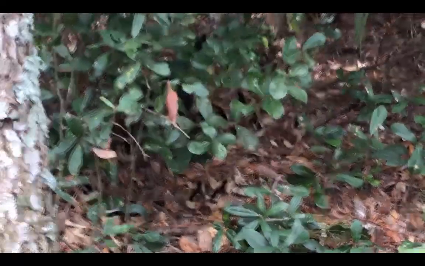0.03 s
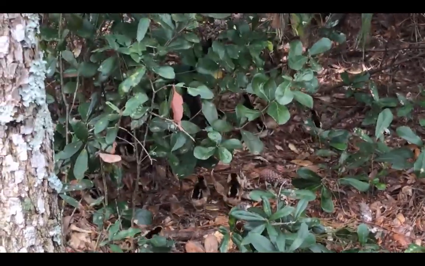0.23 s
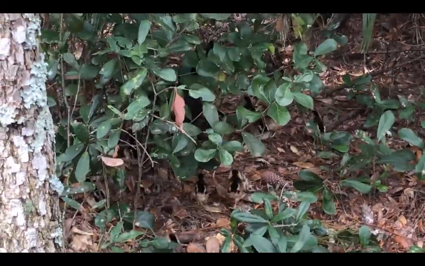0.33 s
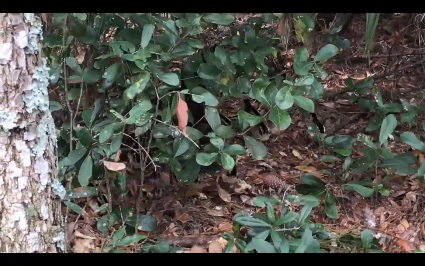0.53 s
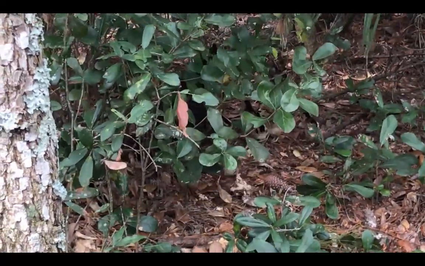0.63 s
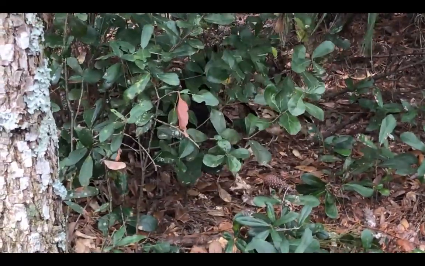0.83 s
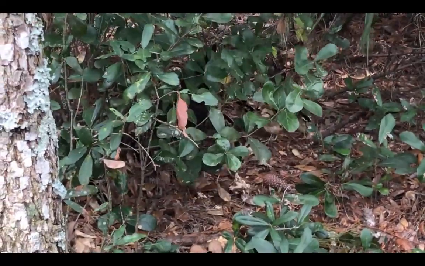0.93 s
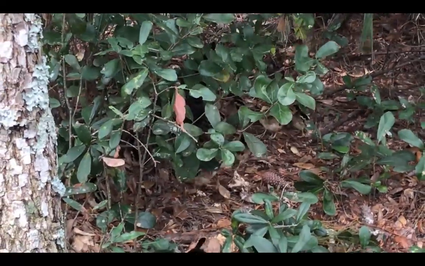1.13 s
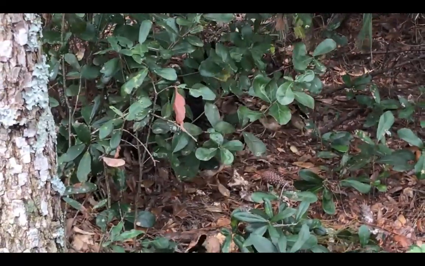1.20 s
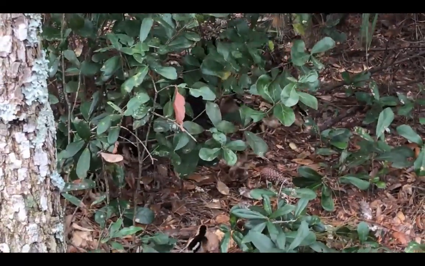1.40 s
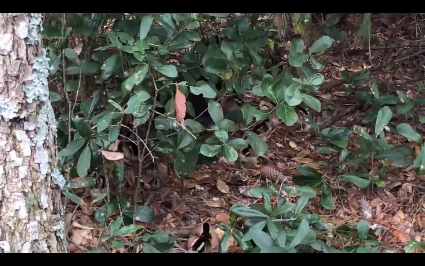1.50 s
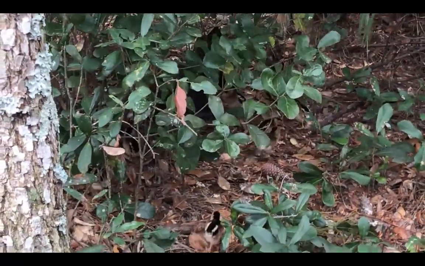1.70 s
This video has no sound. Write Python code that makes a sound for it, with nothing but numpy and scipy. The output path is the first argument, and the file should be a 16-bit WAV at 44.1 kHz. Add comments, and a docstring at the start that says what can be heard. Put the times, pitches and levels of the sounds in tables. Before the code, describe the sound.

Dry leaf litter crackles and ticks in small bursts as birds scratch through it nearby. Quiet, high peeps and short clucks come in between, over a steady woodland hush and soft, low puffs of wind on the microphone.

```python
"""At the edge of a wood, chicks scratch in dry leaves a few metres from a microphone.
Their feet make bursts of tiny crackles, and now and then a leaf or twig snaps.
They peep in thin whistles, and a few short low clucks, two louder than the rest, ring in a throat.
Puffs of light wind thump on the microphone over the steady hush of air in the trees."""
import sys
import numpy as np
from scipy import signal
from scipy.fft import rfft, irfft, next_fast_len
from scipy.io import wavfile
from scipy.ndimage import map_coordinates

SR = 44100
rng = np.random.default_rng(int(sys.argv[2]) if len(sys.argv) > 2 else 0)


def generate_wav(sig):
    """Save sig (samples, or channels by samples) to the path in sys.argv[1] as 16-bit PCM at SR."""
    pcm = np.round(np.clip(np.atleast_2d(sig).T, -1, 1) * 32767).astype(np.int16)
    wavfile.write(sys.argv[1], SR, pcm)


N = 77175
T = np.arange(N) / SR  # the time of each sample in seconds

# The tone of air in the trees. Each row: frequency in Hz, relative strength in dB.
HUSH_TONE = [(200, -1), (320, 4.5), (470, -2), (650, 2.5), (1150, 3.5), (1600, -1.5), (2100, -7),
             (3000, -9.5), (4000, -9), (4900, -14.5), (6700, -12.5), (7700, -20), (9500, -18.5),
             (10400, -37), (12000, -21), (15500, -53)]
# How loud that hush is. Each row: time in seconds, level in dB.
HUSH_LOUDNESS = [(0, -54.5), (.45, -53), (.9, -52), (1.75, -51.5)]
# The tone of air moving past the microphone. Each row: frequency in Hz, relative strength in dB.
RUMBLE_TONE = [(20, -14), (40, -5), (65, 11), (95, -4.5), (140, -2.5), (220, -13.5), (400, -33.5)]
# How loud that rumble is. Each row: time in seconds, level in dB.
RUMBLE_LOUDNESS = [(0, -50.5), (.05, -53), (.25, -49.5), (.47, -51.5), (.6, -52.5), (.88, -50.5),
                   (1.0, -49), (1.14, -54), (1.21, -53), (1.4, -50.5), (1.61, -56), (1.67, -48),
                   (1.75, -54.5)]
# Swirls of wind. Each row: time in seconds, peak level in dB, band centre in Hz, band narrowness.
WIND_PUFFS = [(.224, -29.5, 41.6, 1.65), (0.242, -33, 40, 4.8), (0.263, -32, 60, 1.6),
              (0.286, -28, 62, 1.3), (0.298, -26.5, 90, 1.2), (0.321, -22, 77, 1.25), (.341, -20, 37, 1.44),
              (0.351, -25.5, 82, 1.4), (0.362, -26, 38, 1.8), (0.397, -30, 62, 1.15), (0.419, -38, 50, 2.7),
              (0.517, -31, 82.4, 2.4), (0.536, -26.5, 43.4, 1.37), (0.68, -46.5, 110, 3.8),
              (0.908, -26.5, 61, 1.86), (0.933, -32.5, 40.4, 1.4), (0.966, -38, 44.7, 3.5),
              (1.017, -39.5, 55, 1.8), (1.058, -30, 41, 1.7), (1.074, -33, 56.5, 1.83),
              (1.306, -34, 70, 2.5), (1.373, -40.5, 80, 2.5), (1.456, -20.5, 83.7, 3.36),
              (1.472, -35.5, 40, 1.8), (1.679, -46, 50, 2.4)]
# The tone of stirring leaves. Each row: frequency in Hz, relative strength in dB.
LEAF_TONE = [(1200, -25), (2300, 9.5), (4000, 1), (7000, -13), (15000, -12)]
# How busily the birds stir the leaves. Each row: time in seconds, level in dB.
LEAF_LOUDNESS = [(0, -57.5), (.1, -63.5), (.27, -58.5), (.375, -65), (.43, -56.5), (.53, -62), (.6, -80),
                 (.66, -62), (.76, -61.5), (.9, -67.5), (1.05, -62.5), (1.2, -68), (1.28, -60), (1.42, -63),
                 (1.48, -69), (1.66, -57), (1.75, -76)]
# Leaves or twigs breaking, and first a low knock on a twig. Each row: start in seconds, level in dB, centre in
# Hz, width in octaves.
TWIG_SNAPS = [(0.064, -41, 417, 0.41), (0.283, -53, 3300, .5), (0.397, -43.5, 1970, 0.8),
              (0.488, -49.5, 2760, 0.39), (.641, -46, 2700, .6), (0.819, -44.5, 3300, 0.62),
              (0.868, -49, 2300, 0.23), (.957, -53, 3270, 0.51), (1.236, -46.5, 2220, 0.4),
              (1.354, -44.5, 2530, 0.33), (1.517, -50, 2450, 0.25)]
# Strokes of a foot. Each row: start and fade time in seconds, level in dB, centre in Hz,
# width in octaves.
FOOT_SCRATCHES = [(0.015, 0.054, -52.5, 2220, 0.57), (0.137, 0.039, -57, 5630, 0.39),
                  (0.401, .018, -50.5, 2010, 0.48), (.64, 0.057, -55, 3320, 0.8),
                  (.73, 0.031, -61, 7400, 0.68), (.755, 0.016, -50, 2600, .6),
                  (0.818, 0.026, -51, 3900, 0.48), (.893, 0.011, -44.5, 1850, 0.33),
                  (.918, .012, -49.5, 1950, 0.11), (0.953, 0.026, -49, 3120, 0.4),
                  (1.042, .03, -57, 2740, 0.21), (1.16, 0.019, -58.5, 6500, 0.83),
                  (1.235, 0.026, -47, 2200, 0.53), (1.254, 0.015, -53.5, 3900, 0.85),
                  (1.355, 0.095, -57, 4380, 1.1), (1.515, 0.027, -53.5, 5000, 0.9),
                  (1.623, 0.035, -55, 4500, 2.2), (1.742, .012, -51, 2700, 0.46)]
# Low clucks. Each row: start and length in seconds, pitch in Hz, level in dB.
CLUCK_CALLS = [(0.127, 0.021, 420, -53), (0.517, 0.017, 426, -53.5), (0.932, 0.024, 570, -44),
               (1.614, 0.033, 303, -45.5), (1.668, 0.015, 512, -53)]
# Where a bird's throat rings. Each row: centre and width in Hz, relative strength in dB.
THROAT_RINGS = [(585, 94, -8.5), (868, 410, -5.5), (1285, 205, -6.5), (1580, 67, -6.5), (2730, 100, -15)]
# Peeps. Each row: start and length in seconds, first, middle and last pitch in Hz, level in dB.
PEEP_CALLS = [(0.341, 0.015, 4100, 4150, 4220, -61), (0.415, 0.02, 3450, 3550, 3300, -62),
              (0.443, 0.022, 4300, 4500, 4530, -66), (.531, .026, 3850, 3880, 3850, -60),
              (.574, .052, 3600, 3640, 3150, -57), (.84, .05, 4000, 3810, 3480, -55),
              (1.083, 0.06, 4000, 3930, 3330, -63), (1.358, 0.034, 4250, 4150, 4100, -60.5),
              (1.393, .024, 4100, 4300, 4750, -64), (1.6, 0.012, 3650, 3720, 3600, -70)]


def amp(db):
    """Turn decibels into a number to multiply a sound by."""
    return 10 ** (np.asarray(db) / 20)


def unit(x):
    """Scale a sound so that its average strength (rms) is 1."""
    return x / np.sqrt(np.mean(x ** 2) + 1e-20)


def at_level(x, length, db):
    """Scale a short sound to an average level of db over its length in seconds."""
    return amp(db) * x * np.sqrt(length * SR / (np.sum(x ** 2) + 1e-20))


def filtered(x, response):
    """Multiply each frequency in a sound by response(hz)."""
    size = next_fast_len(N + SR // 2)
    hz = np.fft.rfftfreq(size, 1 / SR) + 1e-3
    return irfft(rfft(x, size) * response(hz), size)[:N]


def coloured(x, tone):
    """Shape a sound with a tone table, at strength 1."""
    points_hz, db = np.transpose(tone)
    return unit(filtered(x, lambda hz: amp(np.interp(np.log(hz), np.log(points_hz), db))))


def loudness(table):
    """A volume curve that slides between the rows of a loudness table."""
    return amp(np.interp(T, *np.transpose(table)))


def noise():
    """An even hiss (white noise)."""
    return rng.standard_normal(N)


def wobble(per_s):
    """A smooth curve through per_s random values a second."""
    return map_coordinates(noise(), [T * per_s + 2])


def arch(start, length):
    """One smooth rise and fall: half a sine wave."""
    return np.abs(np.sin(np.pi * np.clip((T - start) / length, 0, 1)))


def hush(waver_db=.5):
    """Distant air in the trees makes a soft, steady noise."""
    return loudness(HUSH_LOUDNESS) * amp(waver_db * wobble(9.4)) * coloured(noise(), HUSH_TONE)


def wood_echo(x, fade_s=.25):
    """Trunks and bushes scatter a short echo that drops 60 dB in fade_s."""
    tail = noise() * amp(-60 * T / fade_s)
    return signal.fftconvolve(x, tail / np.linalg.norm(tail))[:N]


def wind(waver_db=1, low_cut_hz=49, churn_amount=.29, churn_s=.054):
    """Moving air rumbles, and each swirl gives the microphone one soft push with some churning."""
    out = loudness(RUMBLE_LOUDNESS) * amp(waver_db * wobble(8.8)) * coloured(noise(), RUMBLE_TONE)
    low_cut = signal.butter(3, low_cut_hz, "high", fs=SR, output="sos")
    for time, db, centre_hz, narrowness in WIND_PUFFS:
        push = np.arange(N) == round(time * SR)
        churn = churn_amount * np.sqrt(centre_hz / SR) * noise() * arch(time - churn_s / 2, churn_s)
        thump = filtered(push + churn, lambda hz: (hz / centre_hz * np.exp(-hz / centre_hz)) ** narrowness)
        puff = signal.sosfilt(low_cut, thump)  # the microphone's bass filter rings a little
        out += amp(db) * puff / np.abs(puff).max()
    return out


def crackle(per_s, spread_db=3):
    """Dry leaves give tiny clicks at random times and of unequal size."""
    clicks = (rng.random(N) < per_s / SR) * np.sign(noise())
    return unit(clicks * amp(spread_db * np.clip(noise(), -2, 2)))


def leaf_band(x, centre_hz, octaves):
    """Dry leaves ring in a band around centre_hz, with little below 500 Hz; the result has strength 1."""
    def response(hz):
        band = 1 / (1 + (np.log2(hz / centre_hz) / octaves) ** 2)
        return band / (1 + (500 / hz) ** 2)
    return unit(filtered(x, response))


def stirring_leaves(swing_db=2):
    """Faint clumps of crackle come as the birds shuffle about."""
    rustle = coloured(crackle(per_s=540), LEAF_TONE)
    clumps = amp(swing_db * wobble(21.54))
    return loudness(LEAF_LOUDNESS) * unit(rustle * clumps)


def snaps(fade_s=.003):
    """A leaf or twig gives way, or a twig is knocked, with a sudden tick."""
    out = np.zeros(N)
    for start, db, centre_hz, octaves in TWIG_SNAPS:
        fade = (T >= start) * np.exp(-np.abs(T - start) / fade_s)
        out += amp(db) * leaf_band(noise(), centre_hz, octaves) * fade
    return out


def scratches(rise_s=.003, rub=.31):
    """Each stroke of a foot is a burst of leaf crackle and rubbing that dies away."""
    out = np.zeros(N)
    for start, fade_s, db, centre_hz, octaves in FOOT_SCRATCHES:
        age = np.maximum(T - start, 0)
        burst = (1 - np.exp(-age / rise_s)) * np.exp(-age / fade_s)
        leaves = leaf_band(crackle(per_s=4500) + rub * noise(), centre_hz, octaves)
        out += amp(db) * leaves * burst
    return out


def throat(hz):
    """A bird's throat favours the frequencies it rings at and weakens the rest."""
    return sum((-1) ** row * amp(db) * 1j * hz * width / (centre ** 2 - hz ** 2 + 1j * hz * width)
               for row, (centre, width, db) in enumerate(THROAT_RINGS))


def clucks(pitch_waver=.0555, rasp=.64):
    """A few rough pulses ring in a bird's throat."""
    out = np.zeros(N)
    for start, length, pitch_hz, db in CLUCK_CALLS:
        cycles = np.cumsum(pitch_hz * (1 + pitch_waver * wobble(300))) / SR
        pulses = unit(np.diff(np.floor(cycles), prepend=0))  # one click per cycle
        voice = (pulses + rasp * noise()) * arch(start, length) ** .5
        out += at_level(filtered(voice, throat), length, db)
    return out


def peeps(pitch_waver=.016, flutter_db=2):
    """The chicks give thin, slightly unsteady whistles, each bending through three pitches."""
    out = np.zeros(N)
    for start, length, first_hz, middle_hz, last_hz, db in PEEP_CALLS:
        bend = np.polyfit([0, .5, 1], [first_hz, middle_hz, last_hz], 2)
        progress = np.clip((T - start) / length, 0, 1)
        hz = np.polyval(bend, progress) * (1 + pitch_waver * wobble(600))
        whistle = np.sin(2 * np.pi * np.cumsum(hz) / SR) * amp(flutter_db * wobble(120))
        out += at_level(whistle * arch(start, length) ** .5, length, db)
    return out


def scene():
    """Mix the birds, hush and wind in one channel; the peeps echo more than the sounds on the ground."""
    ground = scratches() + snaps() + stirring_leaves() + clucks()
    calls = peeps()
    echo = wood_echo(amp(-17) * ground + amp(-10) * calls)
    return (ground + calls + echo + hush() + wind())[None]


def record(dry):
    """The recorder keeps nothing above 15700 Hz."""
    return np.array([filtered(channel, lambda hz: hz < 15700) for channel in dry])


dry = scene()
out = record(dry)
generate_wav(out)
```